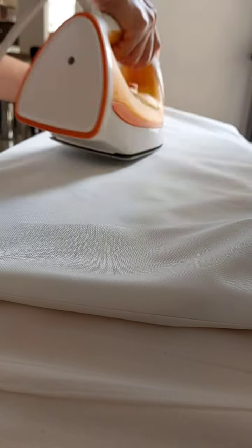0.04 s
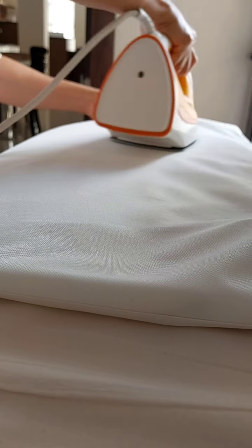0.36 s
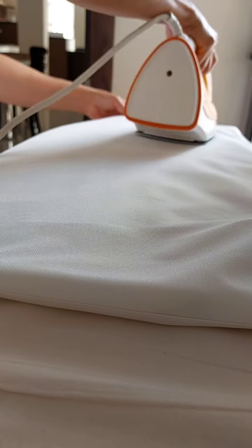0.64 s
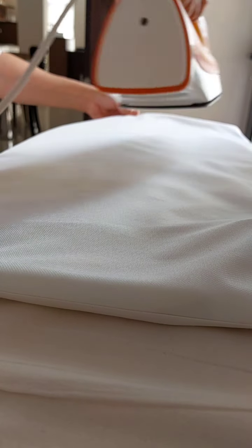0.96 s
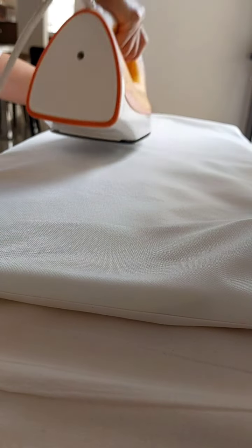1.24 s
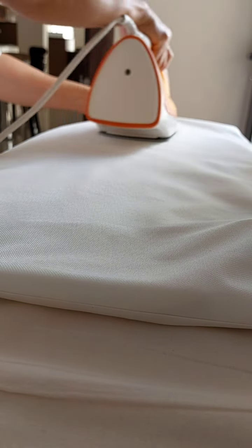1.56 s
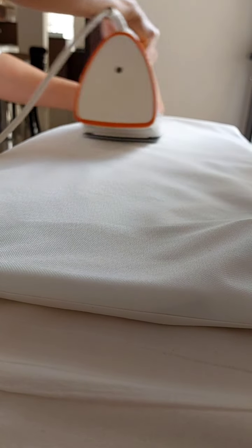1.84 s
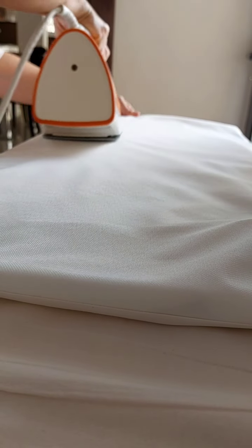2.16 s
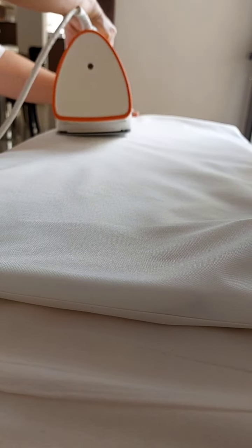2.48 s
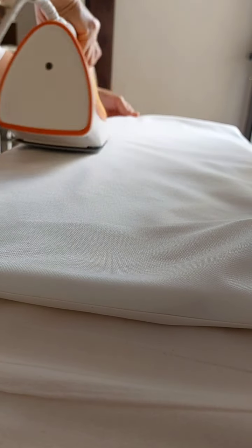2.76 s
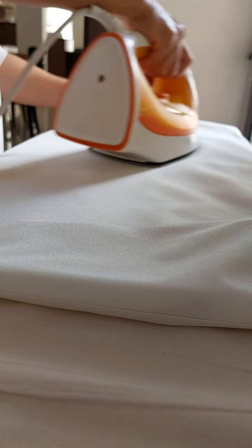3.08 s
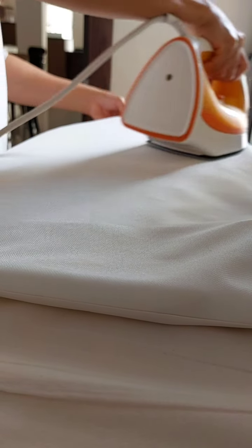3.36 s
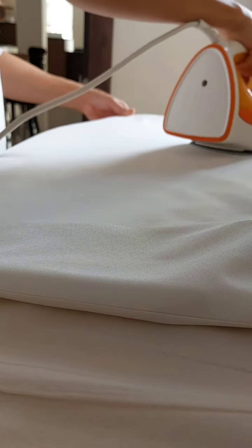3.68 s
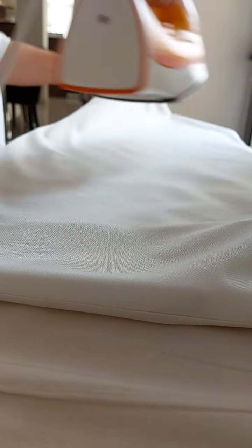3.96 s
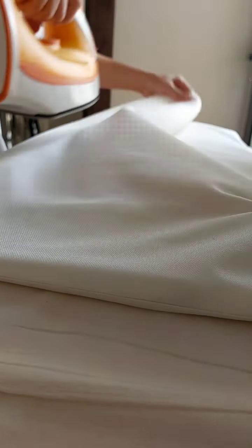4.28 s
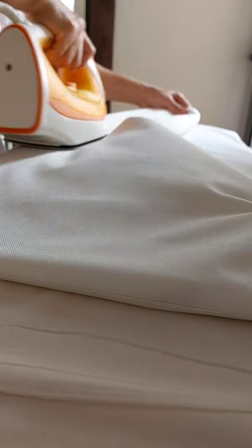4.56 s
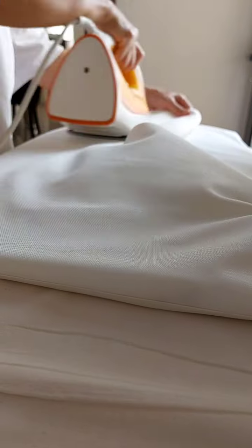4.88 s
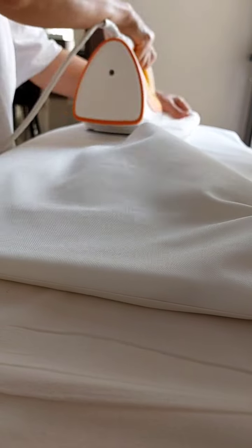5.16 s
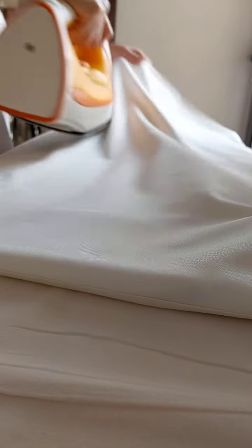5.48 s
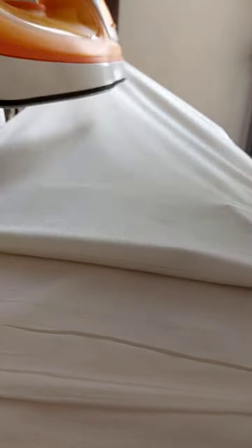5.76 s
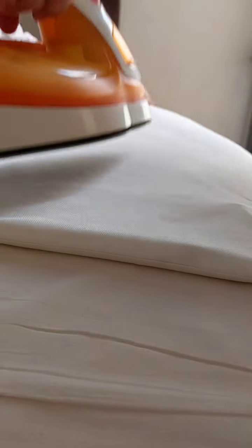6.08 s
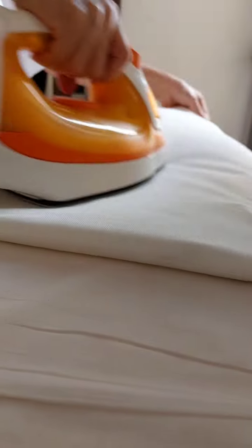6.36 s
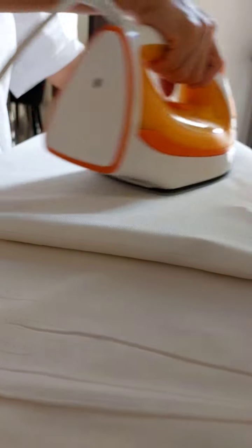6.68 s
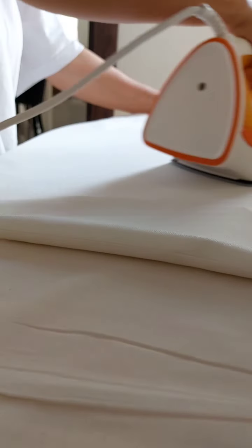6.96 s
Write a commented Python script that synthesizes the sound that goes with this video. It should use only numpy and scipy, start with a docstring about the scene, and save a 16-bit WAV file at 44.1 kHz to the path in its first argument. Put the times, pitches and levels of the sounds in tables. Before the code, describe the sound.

Faint hissing strokes of an iron on fabric go on for several seconds indoors, dotted with small bumps and ticks. Then the ironing board gives a short, rasping creak as the cloth is dragged across it, and the iron comes down with a heavy boom, by far the loudest sound. Fabric crackles against the microphone resting on the board, mostly on the right, with a lighter thud before the soft sliding resumes.

```python
"""An iron glides to and fro over a sheet on a padded board in a quiet room; sliding friction hisses on the weave.
The sheet is pulled along: stick-slip friction makes the board creak, and the iron lands with a thump.
Each impact excites the damped modes of the board, the soleplate or the iron's shell.
The microphone lies on the same board, so knocks reach it through the solid as booms,
and the shifting cloth scuffs its right port."""
import sys
import numpy as np
from scipy import signal
from scipy.fft import rfft, irfft, next_fast_len
from scipy.io import wavfile

SR = 44100
rng = np.random.default_rng(int(sys.argv[2]) if len(sys.argv) > 2 else 0)


def put_to_file(sound):
    """Save the sound as 16-bit audio at rate SR, in the file named by the first command-line argument."""
    columns = np.atleast_2d(sound).T  # one column per channel
    safe = np.clip(columns, -1, 1)
    whole_steps = np.round(safe * 32767)
    wavfile.write(sys.argv[1], SR, whole_steps.astype(np.int16))


N = 314433
TIME = np.arange(N) / SR


def from_db(db):
    """Amplitude ratio of a level; all table levels are relative, taken before the mixing gains."""
    return 10 ** (np.asarray(db) / 20)


def unit_rms(x):
    """Normalisation to unit mean power."""
    return x / np.sqrt(np.mean(x ** 2) + 1e-20)


def at_bins(points, size):
    """Interpolation of a (frequency, value) table onto FFT bins, along a logarithmic frequency axis."""
    hz, value = np.transpose(points)
    bin_hz = np.arange(size // 2 + 1) * SR / size
    return np.interp(np.log(bin_hz + 1), np.log(hz), value)


def pan(left_db):
    """Level difference, left over right, as two gains whose mean is one."""
    gains = from_db(np.array([[left_db], [-left_db]]) / 2)
    return gains / gains.mean()


def drift(rate_hz):
    """Random modulation of unit rms, lying mostly below the given rate."""
    knots = rng.standard_normal(4000)
    return unit_rms(np.interp(TIME * rate_hz * 2, np.arange(len(knots)), knots))


def envelope(s, held, rise, t60):
    """Gaussian rise up to time s, a hold, then exponential decay by 60 dB in t60 seconds."""
    t = TIME[::16]
    run_up = np.minimum((t - s) / max(rise, 1e-4), 0)
    fall = np.maximum(t - s - held, 0) / t60
    attenuation = 2 * run_up ** 2 + np.log(1000) * fall
    return np.interp(TIME, t, np.exp(-np.minimum(attenuation, 30)))


def swell(s, half_width):
    """Gaussian envelope centred on time s."""
    return np.exp(-np.minimum(((TIME - s) / half_width) ** 2, 30))


def add(out, s, sound):
    """Superposition of a sound onto the mix at time s."""
    start = max(round(s * SR), 0)
    out[:, start:start + sound.shape[-1]] += sound[:, :N - start]


# Likeness of the sound at the two ports: (frequency [Hz], correlation [-1..1])
PORT_CORRELATION = [(60, 0.52), (130, 0.96), (290, 0.72), (640, 0.12), (1400, -0.27), (3000, 0.014),
                    (15000, 0.041)]

def coloured(source, spectrum):
    """Spectral shaping in mid and side: their power ratio makes the two ports alike in the bass."""
    size = next_fast_len(N, True)
    alike = np.clip(at_bins(PORT_CORRELATION, size), -.99, .99)
    shaped = rfft(source, size) * from_db(at_bins(spectrum, size)) * np.sqrt([1 + alike, 1 - alike])
    mid, side = irfft(shaped, size)[:, :N]
    return np.array([mid + side, mid - side]) / mid.std()


def noise(spectrum):
    """Gaussian stereo noise with the given spectrum."""
    return coloured(rng.standard_normal((2, N)), spectrum)


def friction(spectrum, per_s, spread_db):
    """Shot noise: threads catch and let go at random, each a tiny impulse of its own size."""
    sizes = from_db(spread_db * np.minimum(rng.exponential(1, N), 4))
    released = rng.random(N) < per_s / SR
    return coloured(sizes * released * rng.standard_normal((2, N)), spectrum)


def struck(blows, modes, vary_db, port_spread, opposed=True):
    """Modal superposition: each blow excites damped sinusoids, and a soft contact spares the high ones."""
    out, t = np.zeros((2, N)), TIME[:SR // 2]
    hz, mode_db, t60 = np.transpose(modes)
    # away from the blow, neighbouring modes swing in opposite phase
    signs = (-1 if opposed else 1) ** np.arange(len(hz))
    rings = signs[:, None] * np.sin(2 * np.pi * hz[:, None] * t) * from_db(-60 * t / t60[:, None])
    for s, peak_db, cutoff_hz in blows:
        right = from_db(mode_db + vary_db * rng.standard_normal(len(hz)))
        left = right * (1 + port_spread * rng.standard_normal(len(hz))) / np.hypot(1, port_spread)
        contact = signal.butter(2, min(cutoff_hz, .4 * SR), fs=SR, output="sos")
        sound = signal.sosfilt(contact, np.array([left, right]) @ rings)
        add(out, s, from_db(peak_db) * sound / np.abs(sound[1]).max())
    return out


def noise_bursts(bursts, width):
    """Bursts of band-limited noise, each decaying exponentially."""
    out, t = np.zeros((2, N)), TIME[:SR // 2]
    for s, db, hz, t60 in bursts:
        edges = np.clip([hz / (1 + width), hz * (1 + width)], 20, .47 * SR)
        band = signal.butter(2, edges, "band", fs=SR, output="sos")
        burst = unit_rms(signal.sosfilt(band, rng.standard_normal((2, len(t)))))
        add(out, s, from_db(db) * burst * from_db(-60 * t / t60))
    return out


def reverberation(x, low_hz, build_s, high_hz=7000, t60_s=0.29):
    """Diffuse field: dense reflections build up and decay exponentially, differently at each port."""
    t = TIME[:SR]
    tail = rng.standard_normal((2, SR)) * from_db(-60 * t / t60_s) * (1 - np.exp(-t / build_s))
    tail /= np.sqrt(np.sum(tail ** 2) / 2)
    tail = signal.sosfilt(signal.butter(1, [low_hz, high_hz], "band", fs=SR, output="sos"), tail)
    return signal.fftconvolve(x.mean(axis=0)[None], tail, axes=1)[:, :N]


# Background of the room: (frequency [Hz], spectral density [dB])
AMBIENT_SPECTRUM = [(20, -23.5), (45, -8.5), (90, -1), (190, -4.5), (335, -3.5), (410, -19.5), (560, -22.5),
                    (850, -24), (1400, -32.5), (2500, -40), (4500, -47.5), (10000, -44.5), (15500, -48)]

def room_tone():
    """Stationary ambient noise, strongest in the bass."""
    return from_db(-56.5) * noise(AMBIENT_SPECTRUM) * pan(0.35)


# The soleplate meeting seams and folds: (time [s], peak level [dB], contact cutoff [Hz])
SEAM_BUMPS = [(0.386, -41, 1500), (0.517, -42, 1300), (0.687, -37.5, 1000), (1.639, -39.5, 1210),
              (1.756, -42, 900), (1.906, -43.5, 1500), (2.387, -37.5, 910), (2.48, -55, 795),
              (2.512, -34.5, 850), (3.565, -42, 1120), (3.743, -37.5, 905), (5.286, -54.5, 665)]
# Soleplate resonances, damped by the cloth: (frequency [Hz], level [dB], T60 [s])
SOLEPLATE_MODES = [(523, -5, 0.02), (671, 7.5, 0.03), (784, 0.5, 0.05), (895, -1, 0.049),
                   (1040, -7.5, 0.028), (1180, -5, 0.055), (1514, -13, 0.019)]
# The plastic shell and cord swivel clacking: (time [s], peak level [dB], contact cutoff [Hz])
SHELL_CLACKS = [(0.036, -42.5, 1500), (0.047, -46, 1290), (0.384, -49.5, 5000), (0.891, -57, 950),
                (1.906, -54, 1600), (1.929, -48, 1700), (1.975, -49, 2050), (4.868, -47.5, 2620)]
# Shell resonances: (frequency [Hz], level [dB], T60 [s])
PLASTIC_MODES = [(986, -4.5, 0.016), (1430, -7.5, 0.026), (1750, -6.5, 0.041), (1960, -2.5, 0.017),
                 (2320, 0.5, 0.018), (2800, -17, 0.014), (3870, -6, 0.0098)]
# Short noisy ticks, the rattle of the shell's clacks and light cloth flicks:
# (time [s], level [dB], centre frequency [Hz], T60 [s])
NOISY_TICKS = [(0.036, -56.5, 1300, 0.062), (0.38, -64, 3100, 0.23), (0.51, -67, 8000, 0.064),
               (.891, -64.5, 1330, 0.25), (1.65, -67, 5300, .2), (1.93, -63, 1850, 0.33),
               (2.319, -63, 5840, 0.15), (2.546, -69, 9000, 0.12), (2.585, -71, 5500, 0.22),
               (3.038, -67, 10000, .06), (3.735, -66, 9000, 0.058), (3.77, -69, 2670, 0.4),
               (4.869, -63.5, 2070, 0.24), (5.153, -61.5, 4270, 0.26)]

def handling():
    """Airborne transients: bumps, clacks and noisy ticks arrive as direct sound plus reverberation."""
    bumps = struck(SEAM_BUMPS, SOLEPLATE_MODES, vary_db=2.0, port_spread=.6)
    clacks = struck(SHELL_CLACKS, PLASTIC_MODES, vary_db=2.0, port_spread=.9)
    ticks = noise_bursts(NOISY_TICKS, width=0.44) * from_db(1.9 * drift(90))
    direct = from_db(-5) * bumps * pan(-1.5) + from_db(-2) * clacks * pan(1.2) + ticks * pan(7)
    radiated = from_db(-3) * bumps + from_db(3) * clacks + from_db(-2) * ticks
    return direct + reverberation(radiated, low_hz=305, build_s=0.009)


# Cloth dragging over the port: (time [s], hold [s], level [dB])
PORT_SCUFFS = [(6.18, 0.051, -43), (6.25, 0.046, -43), (6.322, 0.014, -44), (6.351, 0.028, -51),
               (6.404, 0.041, -51), (6.61, 0.0041, -47.5), (6.63, .015, -56.5), (6.673, 0.005, -45.5),
               (6.735, 0.061, -51)]
# Its crackle: (frequency [Hz], spectral density [dB])
SCUFF_SPECTRUM = [(25, -14), (55, -26), (110, 8.5), (350, 2), (700, -3.5), (1300, -8.5), (2400, -13.5),
                  (4000, -23), (8000, -34.5), (12000, -26.5), (16000, -33)]
# The weave snagging on the port: (time [s], level [dB])
PORT_SNAGS = [(6.211, -27), (6.221, -34.5), (6.23, -33.5), (6.332, -56), (6.431, -46), (6.611, -48.5),
              (6.674, -45.5), (6.732, -53), (6.804, -51)]
# Its snap: (frequency [Hz], spectral density [dB])
SNAG_SPECTRUM = [(300, -14), (900, 5), (2200, 7), (4000, -7), (8000, -20), (12000, -15), (16000, -19)]
RIGHT_PORT_PAN_DB = -18.5

def port_scuff():
    """Contact noise: cloth crackles and snags directly on the microphone's right port."""
    contact = sum(from_db(db) * envelope(s, held, rise=0.015, t60=0.087) for s, held, db in PORT_SCUFFS)
    crackle = contact * friction(SCUFF_SPECTRUM, per_s=4500, spread_db=2.8)
    snagging = sum(from_db(db) * envelope(s, held=0.00067, rise=0, t60=0.017) for s, db in PORT_SNAGS)
    snaps = snagging * noise(SNAG_SPECTRUM)
    return (from_db(3.0) * crackle + snaps) * pan(RIGHT_PORT_PAN_DB)


# Hands leaning on the board: (time [s], half-width [s], rumble level [dB], puff level [dB])
HAND_PRESSES = [(2.47, 0.14, -53.5, -48.5), (3.77, 0.13, -54, -83), (4.03, 0.076, -57, -56),
                (4.22, 0.11, -57.5, -58), (4.53, 0.12, -53, -56.5), (5.221, 0.096, -53.5, -70),
                (5.87, 0.3, -46.5, -67), (6.228, 0.066, -27.5, -35), (6.285, 0.1, -42.5, -57),
                (6.653, 0.056, -43, -45), (6.79, 0.09, -61, -77)]
# Air pushed into the port: (frequency [Hz], spectral density [dB])
PUFF_SPECTRUM = [(15, -29), (35, -16), (62, 13), (78, 0), (105, -23), (200, -30.5), (600, -67)]
# The board under load: (frequency [Hz], spectral density [dB])
RUMBLE_SPECTRUM = [(20, -17), (55, -4), (90, -6.5), (160, 0), (240, -1.5), (330, -4.5), (480, -19),
                   (900, -30), (2000, -66)]

def leaning(resting_db=-62.5):
    """Varying load: the board rumbles under iron and hands, and displaced air puffs at the port."""
    airflow = sum(from_db(db) * swell(s, width) for s, width, _, db in HAND_PRESSES)
    hand_load = sum(from_db(db) * swell(s, width) for s, width, db, _ in HAND_PRESSES)
    puff = airflow * noise(PUFF_SPECTRUM)
    rumble = (from_db(resting_db) + hand_load) * noise(RUMBLE_SPECTRUM)
    return puff * pan(RIGHT_PORT_PAN_DB) + rumble * pan(-6)


# Dull blows on the board: (time [s], peak level [dB], contact cutoff [Hz])
BOARD_BLOWS = [(0.247, -38, 302), (1.37, -40.5, 403), (2.523, -34.5, 200), (3.745, -34.5, 300),
               (5.232, -35.5, 203), (5.668, -25, 600), (5.713, -30, 603), (6.013, -28.5, 250),
               (6.179, -15, 300), (6.21, -2, 435), (6.2435, -33, 203), (6.609, -19, 410), (6.671, -34, 300)]
# Resonances of the board's top: (frequency [Hz], level [dB], T60 [s])
PLATE_MODES = [(60.3, -2.5, .28), (120, -15, .12), (175, 0, .17), (205, -7, .06), (226, -3, .15),
               (290, -9, .04), (347, -5, .12), (440, -10, .04)]

def thumps(low_hz=43):
    """Impact excitation of a plate: the top booms in its modes, and the deepest bass is filtered away."""
    ringing = struck(BOARD_BLOWS, PLATE_MODES, vary_db=1.5, port_spread=0.5, opposed=False)
    return signal.sosfilt(signal.butter(2, low_hz, "high", fs=SR, output="sos"), ringing)


# The sheet dragging over the top: (time [s], hold [s], starting pitch [Hz], level [dB])
TOP_GROANS = [(4.48, 0.12, 114.8, -50), (5.169, 0.035, 175, -50), (5.67, 0.017, 280, -37),
              (5.716, 0.011, 220, -26), (5.755, 0.039, 185, -39), (5.816, 0.045, 136, -28.5),
              (5.9, 0.021, 158, -28)]

def groans(waver=0.081, sag_hz_per_s=570, octave_db=-14.5):
    """Friction-driven oscillation: the top catches and slips at a low, unsteady, sagging pitch."""
    out, unsteady = 0, 1 + waver * drift(55)
    for s, held, hz, db in TOP_GROANS:
        pitch = (hz - sag_hz_per_s * np.clip(TIME - s, 0, held)) * unsteady
        phase = 2 * np.pi * np.cumsum(pitch) / SR
        tone = np.sqrt(2) * (np.sin(phase) + from_db(octave_db) * np.sin(2 * phase))
        out = out + from_db(db) * envelope(s, held, rise=0.0056, t60=0.056) * tone
    return out


# The frame's two creaks, as the sheet is pulled and as the iron bears down, one list each:
# (time [s], slip interval [s], peak level [dB], contact cutoff [Hz])
CREAK_STRAIN = [
    [(5.755, .009, -28.5, 900), (5.8, .008, -26, 1000), (5.825, 0.0089, -20, 1100),
     (5.855, 0.013, -17.5, 1250), (5.868, 0.017, -18.5, 1250), (5.912, 0.022, -18, 1200)],
    [(6.152, .006, -23.5, 850), (6.165, 0.0082, -21, 1100), (6.188, 0.013, -14, 1180)],
]

def frame_slips(max_per_creak=32, jitter=.02, vary_db=.7):
    """Stick-slip motion: as strain grows, the frame holds longer and lets go harder, one blow a slip."""
    slips = []
    for creak in CREAK_STRAIN:
        times, *strain = np.transpose(creak)
        s = times[0]
        for late, hard in rng.standard_normal((max_per_creak, 2)):
            if s <= times[-1]:
                gap, db, hz = (np.interp(s, times, column) for column in strain)
                slips.append((s, db + vary_db * hard, hz))
                s += gap * (1 + jitter * late)
    return slips


def sheet_rasp(slips, top_db=-44, db_per_db=1.47, centre_hz=2600, t60_s=0.068):
    """Power-law friction noise: the taut sheet rasps over the board's edge, far more at hard slips."""
    hardest_db = max(db for _, db, _ in slips)
    bursts = [(s, top_db + db_per_db * (db - hardest_db), centre_hz, t60_s) for s, db, _ in slips]
    return noise_bursts(bursts, width=0.36)


# The soleplate jolting the frame: (time [s], peak level [dB], contact cutoff [Hz])
IRON_LANDING = [(6.203, -13, 1700)]
# Frame resonances: (frequency [Hz], level [dB], T60 [s])
BOARD_FRAME_MODES = [(402, -11.5, 0.071), (488, 1, 0.02), (591, -6.5, 0.044), (651, 1, 0.014),
                     (742, -0.5, 0.036), (851, -22, 0.086), (983, -4.5, 0.013), (1118, -15, 0.065),
                     (1180, -12.5, 0.024), (1400, -24, 0.21), (1546, -19, 0.032), (1993, -19.5, 0.046),
                     (2356, -17, 0.019)]

def board():
    """Structure-borne sound: booms and creaks come mostly through the board, joined by rasp and echo."""
    booms = thumps() + groans()
    slips = frame_slips()
    creaks = struck(IRON_LANDING + slips, BOARD_FRAME_MODES, vary_db=2.5, port_spread=1.0)
    rasp = sheet_rasp(slips)
    radiated = from_db(-8) * creaks + from_db(1) * booms + from_db(-1) * rasp
    echo = reverberation(radiated, low_hz=1140, build_s=0.006)
    return creaks * pan(-11.5) + booms * pan(-13.5) + rasp * pan(1.5) + echo


# Strokes of the iron and pulls of the sheet:
# (time at full speed [s], hold [s], rise [s], hiss level [dB], rub level [dB])
IRON_STROKES = [(0, .01, .05, -66.5, -67), (.27, 0.32, 0.1, -70, -68), (.72, 0.17, 0.11, -90, -70),
                (1.43, 0.25, 0.035, -71.5, -75), (1.93, 0.069, 0.16, -70.5, -64),
                (2.24, 0.13, 0.14, -73.5, -73), (2.38, 0.27, 0.12, -76, -65), (3.03, 0.21, 0.45, -74, -72),
                (3.35, 0.26, 0.17, -71.5, -67.5), (3.75, 0.079, 0.035, -71, -64),
                (4.07, 0.17, 0.14, -66.5, -62), (4.76, 0.35, 0.21, -74, -71.5),
                (5.17, 0.22, .05, -77, -73.5), (5.602, 0.26, 0.097, -61.5, -61.5),
                (6.2, 0.29, 0.56, -73.5, -61.5), (6.62, .19, 0.13, -69.5, -72),
                (6.9, 0.13, 0.28, -76.5, -70.5)]
# The weave under the soleplate: (frequency [Hz], spectral density [dB])
WEAVE_SPECTRUM = [(1000, -2.5), (2000, -2), (3500, -9), (5200, -3.5), (7500, -7), (10000, -4.5),
                  (14000, -8), (16000, -12.5)]
# The padding beneath it: (frequency [Hz], spectral density [dB])
PADDING_SPECTRUM = [(250, -12), (450, 0.5), (560, -3.5), (760, -1), (1100, -7.5), (1500, -13.5),
                    (2300, -19.5), (3500, -33), (6000, -36.5)]

def iron_glide(hiss_t60_s=0.55, rub_t60_s=0.61):
    """Sliding friction: with each stroke the weave hisses while the padding rubs at lower frequencies."""
    hiss_gain = sum(from_db(db) * envelope(s, held, rise, hiss_t60_s)
                    for s, held, rise, db, _ in IRON_STROKES)
    rub_gain = sum(from_db(db) * envelope(s, held, rise, rub_t60_s)
                   for s, held, rise, _, db in IRON_STROKES)
    hiss = hiss_gain * friction(WEAVE_SPECTRUM, per_s=27000, spread_db=-3.0) * from_db(0.46 * drift(4.2))
    rub = rub_gain * friction(PADDING_SPECTRUM, per_s=2500, spread_db=1.0) * from_db(2.0 * drift(8))
    return from_db(-3.0) * hiss * pan(13.5) + from_db(-0.5) * rub * pan(-6.5)


def scene():
    """Linear superposition of all sources at the microphone."""
    return room_tone() + iron_glide() + handling() + port_scuff() + leaning() + board()


def record(dry, ceiling=.92, cutoff_hz=15500):
    """Soft saturation rounds the loudest peaks, and a steep low-pass limits the bandwidth."""
    rounded = dry / (1 + (dry / ceiling) ** 6) ** (1 / 6)
    return signal.sosfilt(signal.ellip(10, .1, 80, cutoff_hz, fs=SR, output="sos"), rounded)


dry = scene()
out = record(dry)
put_to_file(out)
```